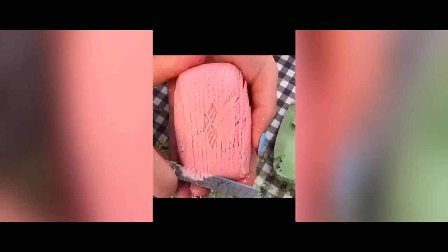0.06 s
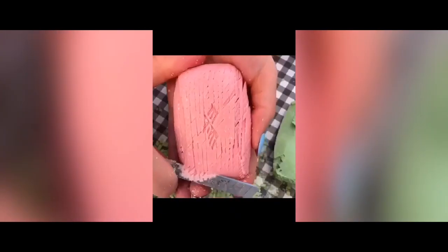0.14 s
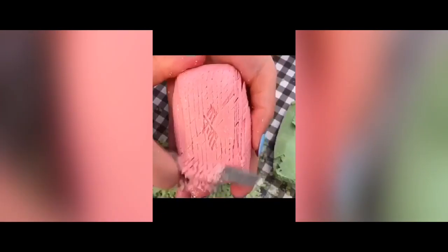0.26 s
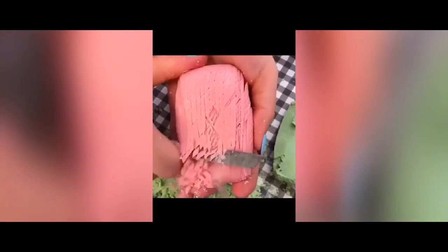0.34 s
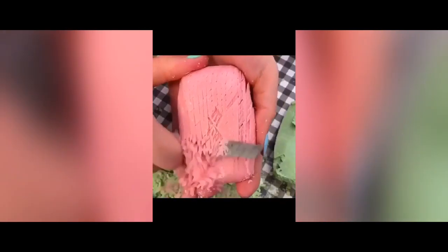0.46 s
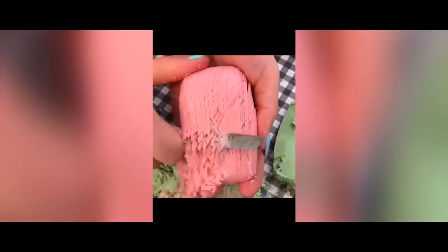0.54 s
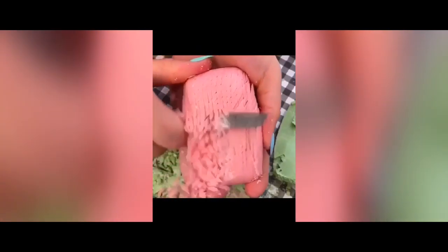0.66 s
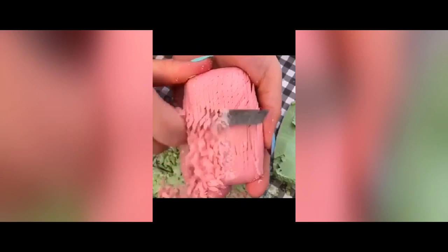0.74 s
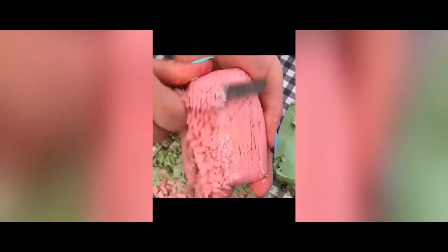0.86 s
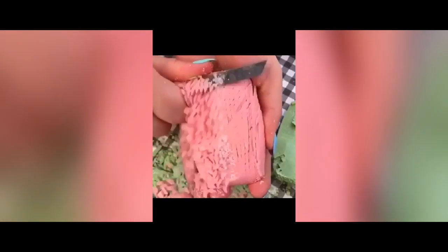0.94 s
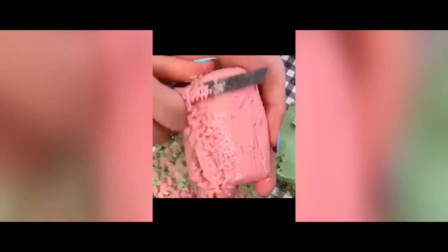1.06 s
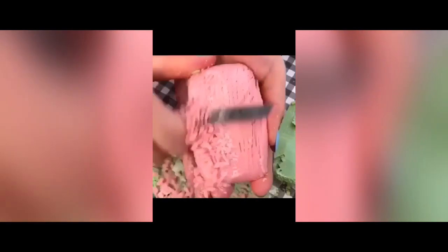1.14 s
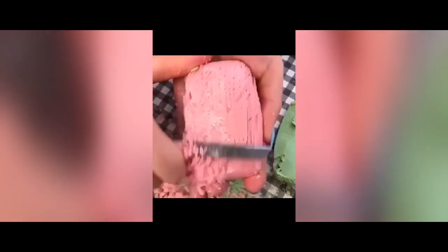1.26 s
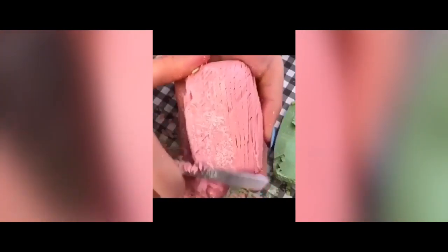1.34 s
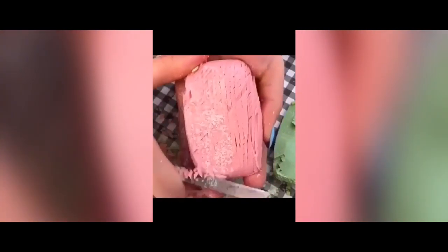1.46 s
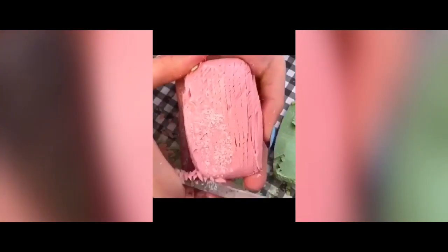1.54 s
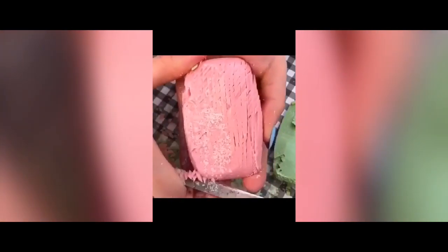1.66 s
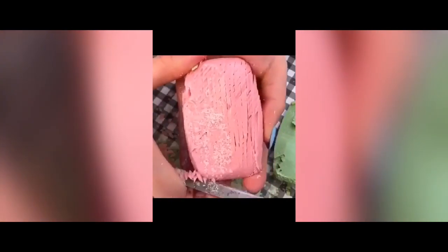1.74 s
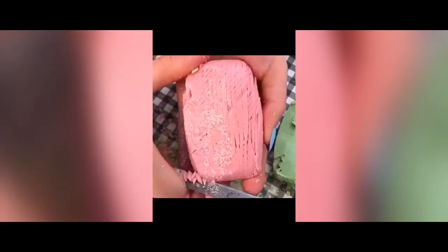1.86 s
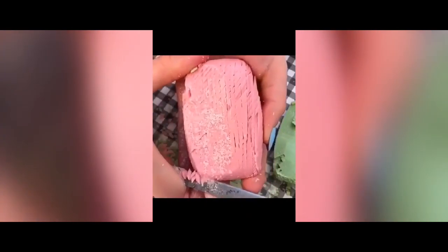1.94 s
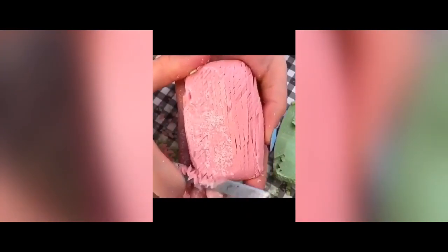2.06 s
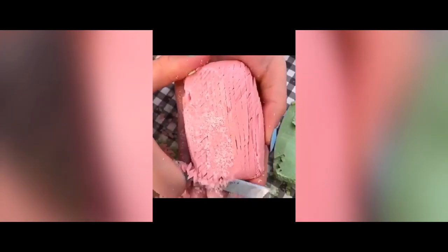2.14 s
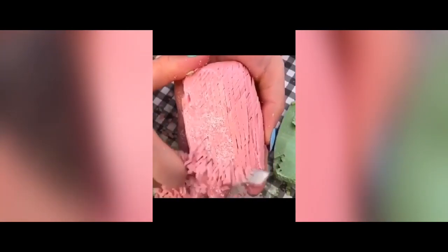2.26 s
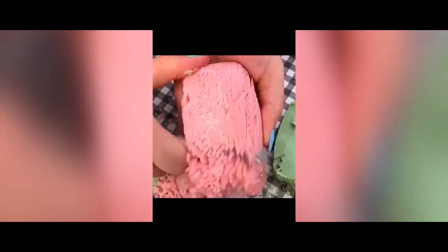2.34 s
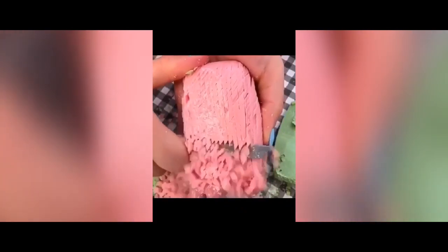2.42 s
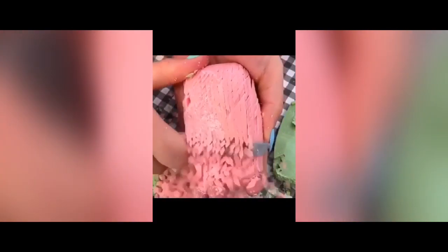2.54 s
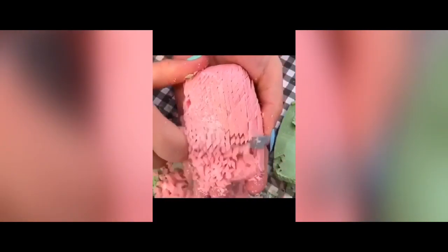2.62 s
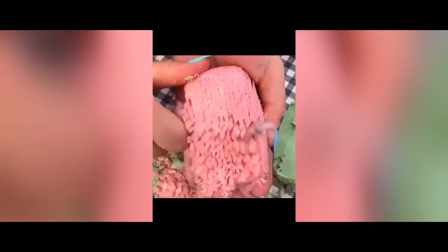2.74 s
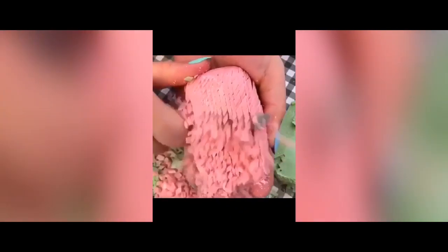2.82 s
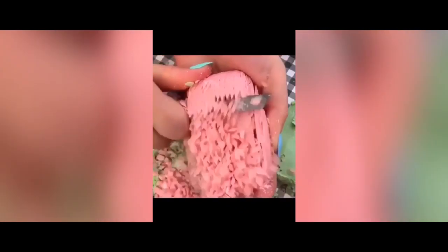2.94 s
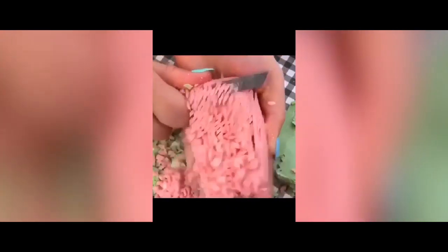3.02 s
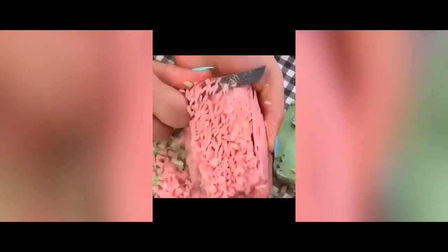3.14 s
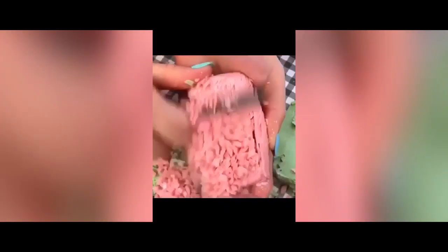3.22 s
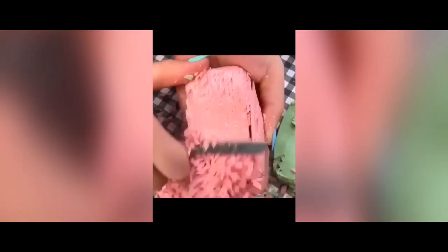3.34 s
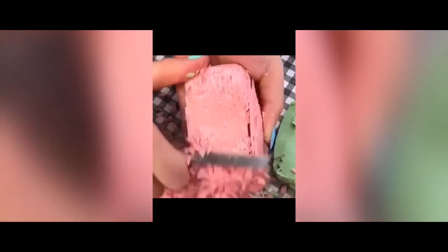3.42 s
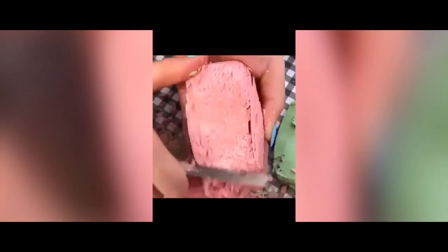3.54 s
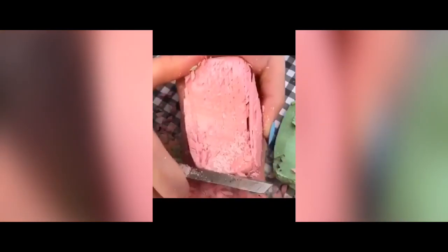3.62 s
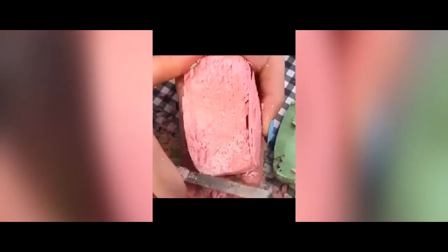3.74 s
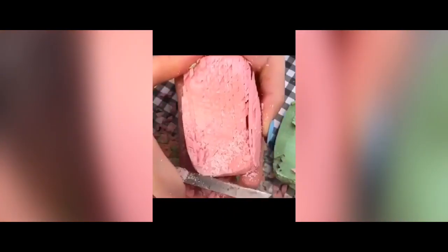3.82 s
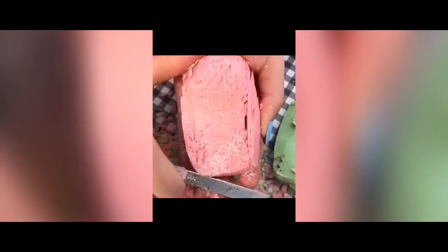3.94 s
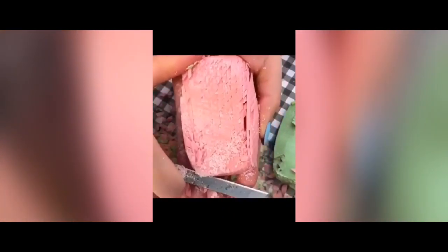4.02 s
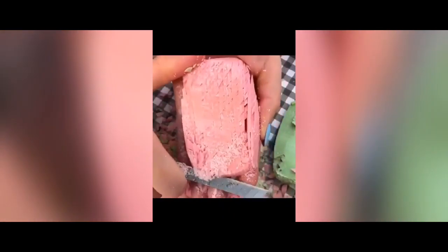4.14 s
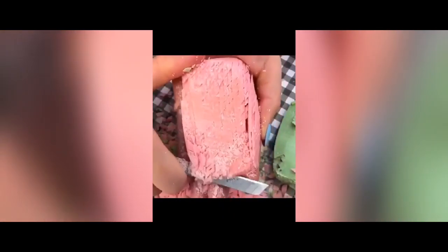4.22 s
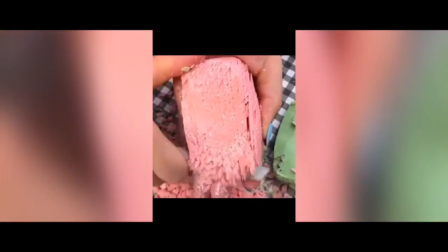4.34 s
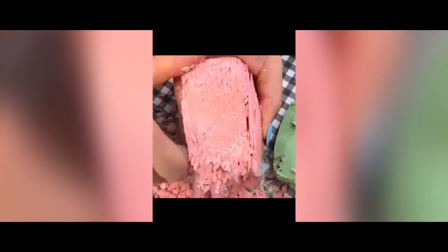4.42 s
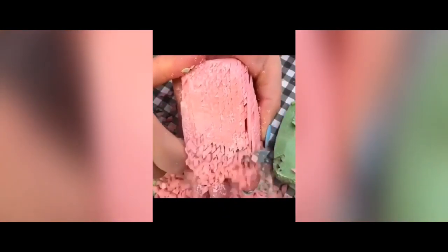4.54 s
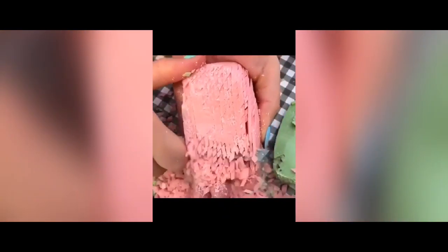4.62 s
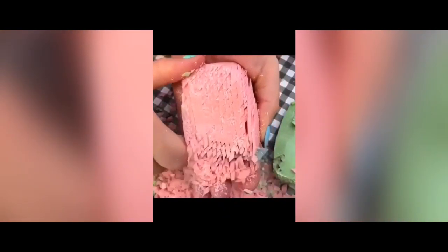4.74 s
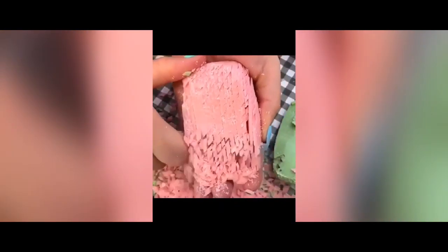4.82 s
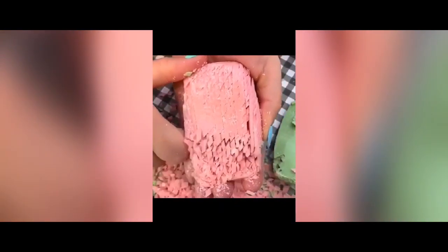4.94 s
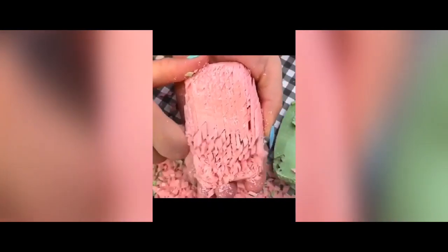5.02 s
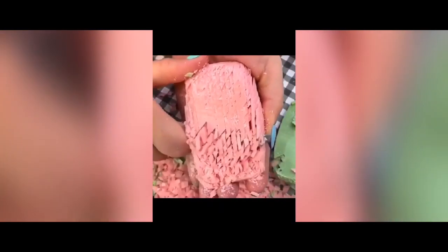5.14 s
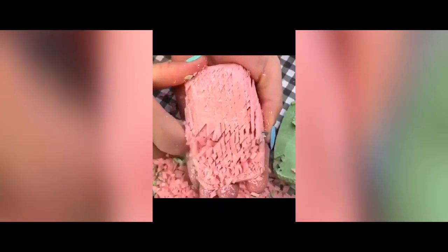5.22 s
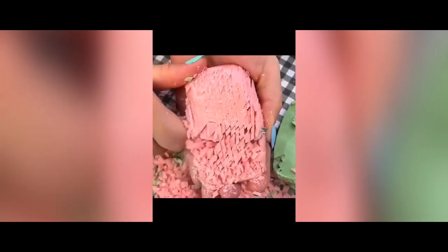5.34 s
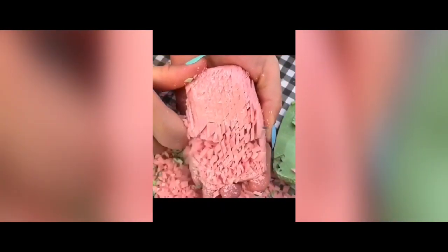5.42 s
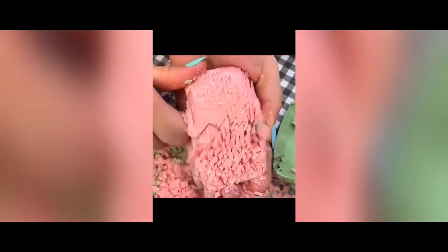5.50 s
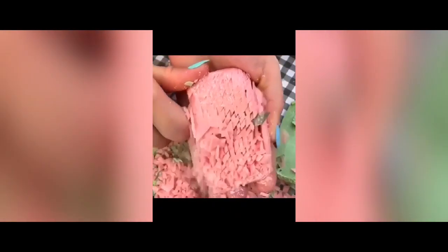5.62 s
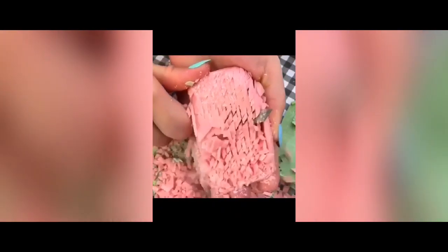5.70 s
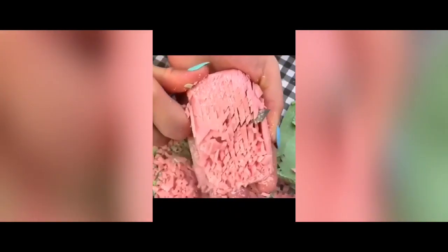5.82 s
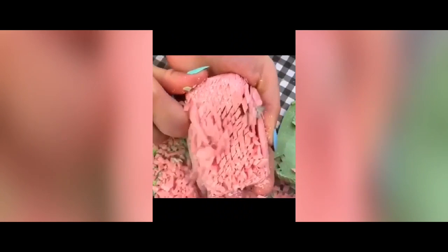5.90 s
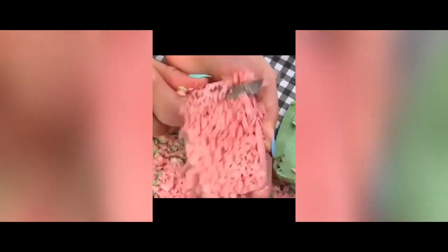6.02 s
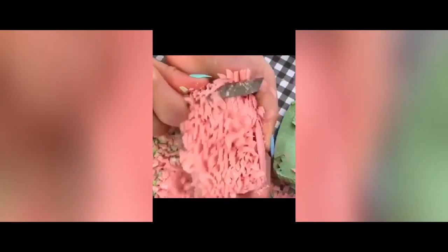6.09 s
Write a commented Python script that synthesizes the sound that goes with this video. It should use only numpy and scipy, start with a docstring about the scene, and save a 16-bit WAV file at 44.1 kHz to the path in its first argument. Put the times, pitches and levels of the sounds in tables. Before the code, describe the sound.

Brittle soap cubes snap and crumble under a blade while pieces patter on a hollow tray. A first crunchy stroke peaks with one hard knock, then settles into scattered clicks. After a near pause comes a thicker, louder stroke, another lull, and a lighter, irregular crackle that brightens at the end. Mono, close and dry, quiet room, highest treble cut off.

```python
"""Bright cracks start almost at once over a faint low hum: a blade is drawn three times through
a dry, pre-scored bar of soap held close to a phone. Cubes snap off as bursts of ringing grit noise
and knock on a hollow tray of resonant modes; random grains make the fine crackle in between.
Below lie coloured room noise that comes and goes, and a sine hum that fades halfway."""
import sys
import numpy as np
from scipy import signal
from scipy.fft import rfft, irfft
from scipy.io import wavfile

SR = 44100
rng = np.random.default_rng(int(sys.argv[2]) if len(sys.argv) > 2 else 0)


def master(y):
    """Save y as 16-bit WAV."""
    cut = np.clip(np.atleast_2d(y).T, -1, 1)
    pcm = np.round(cut * 32767)  # scale
    wavfile.write(sys.argv[1], SR, pcm.astype(np.int16))


def convert_level_to_amplitude(level_db):
    """Map a level in decibels to its linear amplitude factor."""
    exponent = np.asarray(level_db, float) / 20
    return 10 ** exponent


N = 271656

# the clearest snaps and knocks: peak_s, crack_drive_db, tray_knock_db, sizzle_drive_db, length_ms
BREAKS = [(0.1544, -54, -83, -76, 21), (0.237, -46, -60, -45, 19), (0.288, -61, -80, -36, 2.8),
          (0.32, -49, -70, -42.5, 11), (0.3515, -58, -66, -22.5, 1.6), (0.364, -35, -62, -42, 18),
          (0.3921, -43, -54, -28, 3), (0.411, -42, -57, -25, 2), (0.4267, -39, -54, -38, 76),
          (0.4726, -29.5, -58, -35, 14.4), (0.572, -42, -71, -33, 1.5), (0.5921, -40, -52, -38, 18.6),
          (0.62, -39, -68, -42, 9.7), (0.742, -37, -58, -53, 7.6), (0.7698, -41, -58, -32.5, 3.6),
          (0.8216, -29.5, -65, -30, 5.6), (0.8445, -33, -51, -35, 4.7), (0.8666, -52, -39.5, -54, 3.3),
          (0.9027, -43, -57, -38, 1), (0.94, -56, -37, -42, 3.1), (0.962, -36, -58, -34, 6.9),
          (0.97, -40, -34.5, -57, 3.5), (1.009, -35, -65, -42, 5.5), (1.0254, -33.5, -55, -31, 3.8),
          (1.0745, -41.5, -62, -44.5, 60), (1.116, -39, -46, -64, 3.4), (1.1644, -21, -18, -52, 4.52),
          (1.199, -33.5, -41, -35.5, 13), (1.2234, -43, -29, -32, 2), (1.2374, -31, -31, -36, 3.9),
          (1.24, -40.5, -39.5, -38, 52), (1.285, -34.5, -44, -44, 52), (1.4245, -32, -35, -38, 3.7),
          (1.459, -37, -45, -62, 2.1), (1.507, -31, -38.5, -45, 3.6), (1.61, -65, -41, -63, 3.1),
          (1.7307, -29.5, -38.5, -63, 3.7), (1.8082, -40, -43, -43, 4.4), (1.8525, -45, -43.5, -54, 6.8),
          (1.9165, -39, -45, -58, 5.2), (1.9683, -67, -50.5, -73, 5.1), (2.1597, -52.5, -66, -51, 19),
          (2.2142, -44, -57, -46, 11), (2.261, -41.5, -55, -40, 6.8), (2.277, -55, -74, -28, 3.5),
          (2.3284, -42, -70, -32, 1.5), (2.374, -41, -54.5, -41.5, 34), (2.4597, -44.5, -56, -38, 80),
          (2.486, -37.5, -51, -33, 13), (2.506, -34, -40.5, -31, 9.2), (2.546, -38, -41.5, -27.5, 8.2),
          (2.6436, -26, -58, -65, 5.8), (2.674, -32, -52, -41, 4.1), (2.7062, -47, -36, -48, 5.6),
          (2.717, -34, -37, -54, 4.5), (2.731, -28, -44, -26, 0.84), (2.7712, -28.5, -30.5, -38, 4.2),
          (2.875, -36, -44, -35.5, 9.5), (2.907, -38, -43, -30.5, 16.7), (2.9296, -33, -38, -32, 6.2),
          (2.955, -43, -59, -30.5, 43), (2.9781, -38, -34.5, -28, 5.2), (3.0498, -47, -30.5, -37, 2.9),
          (3.052, -45, -27, -28, 1.73), (3.0562, -33, -38, -30, 2.4), (3.074, -23, -26, -33, 2.3),
          (3.076, -42, -32, -36, 2), (3.092, -29, -32, -49, 3.6), (3.0962, -40, -23.5, -39, 2.48),
          (3.16, -29, -36, -47, 1.9), (3.165, -40, -51, -41, 100), (3.2255, -30, -26.5, -45, 4.06),
          (3.273, -26.5, -33, -32.5, 5.2), (3.3065, -54, -44, -38, 3.2), (3.3317, -24.5, -32, -65, 2.2),
          (3.387, -50, -35.5, -61, 4.9), (3.439, -32.5, -47, -61, 55), (3.4942, -33, -50, -41, 3),
          (3.5176, -27.5, -38, -43, 2.6), (3.6322, -34, -35, -48, 1.7), (3.7436, -32.5, -36, -48, 7.44),
          (3.847, -44, -36.5, -66, 1), (3.878, -40, -55, -79, 3.2), (3.9841, -50.5, -49, -60, 12.6),
          (4.0278, -36.5, -40, -75, 1.06), (4.1474, -61, -75, -47, 4.8), (4.2297, -49, -63, -57, 17),
          (4.33, -41, -46, -45.5, 19), (4.4127, -62, -39.5, -61, 4.3), (4.478, -61, -51, -20, 2.1),
          (4.539, -36, -74, -34, 4.5), (4.589, -40, -43.5, -29.5, 6.9), (4.7352, -30.5, -23.5, -32.5, 4.6),
          (4.795, -57, -42, -58, 6), (4.8068, -57, -40, -62, 2.7), (4.8463, -54.5, -62, -64, 3.9),
          (4.8731, -33.5, -36.5, -40, 6.4), (4.917, -42, -47, -54, 3.1), (4.9684, -49.5, -70, -41, 1.5),
          (4.989, -75, -45.5, -56, 4.3), (5.0678, -73, -54.5, -50, 5.3), (5.1129, -75.5, -54, -32, 1.2),
          (5.1208, -36.5, -48.5, -32.5, 3.06), (5.192, -50, -54, -46, 2.1), (5.2072, -61, -59, -41, 1.2),
          (5.314, -49, -51, -40, 2.3), (5.3632, -65, -49, -31.5, 1.8), (5.3779, -44, -51.5, -68, 9.9),
          (5.386, -35.5, -40, -55, 2.7), (5.458, -66, -52.5, -49, 5), (5.517, -52, -73, -35, 0.81),
          (5.5257, -47, -52, -46, 4), (5.545, -38.5, -60, -36, 1.7), (5.668, -72, -50, -30.5, 1.3),
          (5.687, -75, -57, -46, 38), (5.705, -71, -48, -39, 4.8), (5.7368, -65, -50, -37, 1.2),
          (5.8103, -64, -49, -26, 3.5), (5.8403, -35.5, -46.5, -35, 2.8), (5.868, -47, -50, -38.5, 6.4),
          (5.9478, -39, -46.5, -52, 5), (5.961, -33, -53, -46, 1.6), (5.988, -43, -47, -43, 22.6),
          (6.0376, -57, -60, -27, 1.8), (6.045, -64, -49, -29.5, 5.8), (6.0972, -42, -53, -32.5, 13),
          (6.1188, -42, -44.5, -25.5, 6.3), (6.1435, -39, -43, -29, 10.8), (6.1501, -45, -56, -21, 1.4)]
# resonant modes of the tray under the falling crumbs: pitch_hz, width_hz, level_db (relative)
TRAY_MODES = [(830, 150, -13), (970, 150, -8), (1130, 190, 0), (1600, 280, -3), (2250, 350, -11),
              (2850, 350, -12), (3550, 260, -12), (4750, 350, -20)]
CRUMB_HZ = np.geomspace(2100, 11800, num=12)  # pitches of crumbs, large to small


def snaps():
    """A break spreads, peaks and crumbles away; small cubes sizzle, heavy ones knock the tray."""
    rise, fall = 0.29, 0.38  # in lengths of the break
    split_hz = 5840  # crack below, sizzle above
    mix_spread_db, spot_spread_db = 3, 2.5  # crumb sizes and tray modes, from one break to the next
    hard, short_ms = 2.2, 8.0  # first contact against the rattle after it, and where it gives way
    t = np.arange(N) / SR
    drive, knock = np.zeros((len(CRUMB_HZ), N)), np.zeros(N)
    force = rng.standard_normal(N)
    small = 1 / (1 + (split_hz / CRUMB_HZ) ** 6)
    # every break frees its own mix of crumb sizes and lands on its own spot
    mixes = convert_level_to_amplitude(mix_spread_db * rng.standard_normal((len(BREAKS), len(CRUMB_HZ))))
    spots = convert_level_to_amplitude(spot_spread_db * rng.standard_normal((len(BREAKS), len(TRAY_MODES))))
    spots = spots * landing(np.array(BREAKS)[:, 0]).T
    uneven = 1.17 + 0.32 * grains(740, 10.6, 0.0001, 0.00069)  # a long break goes in jerks
    for (peak_s, crack_db, knock_db, sizzle_db, ms), mix, spot in zip(BREAKS, mixes, spots):
        peak = int(peak_s * SR)
        at = slice(max(peak - SR // 25, 0), peak + SR // 10)
        lag = (t[at] - peak_s) * 1000 / max(ms, 1)  # in lengths
        burst = np.where(lag < 0, np.exp(-(lag / rise) ** 2 / 2), np.exp(-np.abs(lag) / fall))
        # the jerks share out the energy of the break without changing it
        jerky = burst * uneven[at]
        burst = jerky * np.linalg.norm(burst) / np.linalg.norm(jerky)
        strength = np.linalg.norm(burst)
        level = convert_level_to_amplitude(crack_db) * (1 - small) + convert_level_to_amplitude(sizzle_db) * small
        drive[:, at] += np.outer(unit(mix) * level, burst)
        started = lag >= -rise
        rattle = burst * force[at] * started
        # a short break is mostly one hard contact, a long one a rattle
        rattle[np.argmax(started)] += hard * strength / (1 + (ms / short_ms) ** 2)
        blow = tray(np.outer(spot, rattle))
        # whichever modes the spot favours, the tray gives back the energy of the blow
        knock[at] += convert_level_to_amplitude(knock_db) * blow * strength / np.linalg.norm(blow)
    return (drive * crumbs()).sum(axis=0) + knock


def crackle():
    """Grit breaking under the blade and crumbs pattering on the tray, too dense to count."""
    # steady crackle of the three strokes: time_s, grit_at_blade_drive_db, tray_patter_drive_db
    strokes = [(0.0, -85.5, -85), (0.301, -60, -84), (0.44, -58, -69), (0.545, -63.5, -71),
               (0.665, -43, -50.5), (0.705, -48.5, -53), (0.725, -58, -61), (0.737, -47, -59),
               (0.788, -45, -53.5), (1.033, -50, -53), (1.141, -60.5, -59), (1.3, -52, -51.5),
               (1.5, -53.5, -51.5), (2.093, -76, -73), (2.206, -51.5, -84), (2.486, -58.5, -60),
               (2.587, -58, -59), (2.722, -43.5, -47), (2.81, -48, -50.5), (2.85, -54.5, -56.5),
               (3.05, -41.5, -47.5), (3.302, -56.5, -51), (3.437, -46, -51.5), (3.74, -49.5, -47),
               (3.954, -71.5, -63), (4.18, -78, -78.5), (4.254, -57, -62.5), (4.38, -59, -65),
               (4.525, -48, -56.5), (4.9, -60, -54), (5.03, -66, -69.5), (5.16, -58, -61),
               (5.27, -66, -70.5), (5.48, -63.5, -71), (5.63, -60.5, -67), (5.75, -56, -68),
               (5.92, -67, -63), (6.16, -48.5, -61.5)]
    t = np.arange(N) / SR
    s, *columns = np.transpose(strokes)
    # the crumbs loosened by the snaps add their power to the steady crackle
    grit_db, patter_db = (10 * np.log10(convert_level_to_amplitude(np.interp(t, s, column)) ** 2 + loose)
                          for column, loose in zip(columns, trickle()))
    # fresh breaks at the blade are bright; crumbs tumbling on the tray are dull (dB per octave)
    tilt_db = np.clip(0.47 * (grit_db - patter_db) - 0.6, -8, 4)
    together = grains(350, 5, 0.0002, 0.002)  # tiny breaks shared by all sizes and by the tray
    breaking = 0
    for hz, ring in zip(CRUMB_HZ, crumbs()):
        alone = grains(90, 15.2, 0.00032, 0.032)  # single crumbs ring at their own pitch
        tilt = convert_level_to_amplitude(tilt_db * np.log2(hz / 5000))
        breaking = breaking + tilt * (0.7 * together + 0.47 * alone + 0.24) * ring
    patter = [convert_level_to_amplitude(patter_db) * (0.3 * together + 0.7 * grains(320, 3.5, 0.0002, 0.0011) + 0.06)
              for _ in TRAY_MODES]
    # the push of the blade shakes the hands, a faint dull rustle that follows the crackle
    dull = signal.butter(1, [110, 650], "band", fs=SR, output="sos")
    push = unit(signal.sosfilt(dull, rng.standard_normal(N)))
    jolts = 0.47 + 0.58 * grains(60, 4, 0.00074, 0.0069)
    shake = convert_level_to_amplitude(-32.5 + 0.44 * patter_db + 0.14 * grit_db) * push * jolts
    forces = patter * landing(t) * rng.standard_normal((len(TRAY_MODES), N))
    return convert_level_to_amplitude(grit_db) * breaking + tray(forces) + shake


def trickle():
    """Power of the grit and patter that every snap sets loose, more from a loud or long one."""
    grit_level_db, patter_level_db = -16.5, -11  # against the snap, before its length counts
    loosen_s, trickle_s = 0.0044, 0.014  # grit starts just before the snap, all trickles away after
    s, crack_db, knock_db, sizzle_db, ms = np.transpose(BREAKS)
    t = np.arange(0, N + 64, 64) / SR  # coarse time grid
    lag = t[:, None] - s
    fade = np.exp(-2 * np.abs(lag) / np.where(lag < 0, loosen_s, trickle_s))
    shape = fade * ms / 1000 / trickle_s
    grit = convert_level_to_amplitude(grit_level_db) ** 2 * shape @ (convert_level_to_amplitude(crack_db) ** 2 + convert_level_to_amplitude(sizzle_db) ** 2)
    patter = convert_level_to_amplitude(patter_level_db) ** 2 * (shape * (lag > 0)) @ convert_level_to_amplitude(knock_db) ** 2
    return [np.interp(np.arange(N) / SR, t, power) for power in (grit, patter)]


def crumbs():
    """Grit noise split into the unrelated rings of crumbs of each size."""
    # spectrum of the breaking grit: pitch_hz, density_db (relative, per Hz)
    grit_spectrum = [(1180, 5), (2000, -9.5), (3180, -2.5), (4120, -4), (8280, -6), (11200, -9),
                     (12300, -13), (16000, -55), (22000, -120)]
    grit = coloured(grit_spectrum)
    return np.array([signal.lfilter(*signal.iirpeak(hz, 5.0, SR), np.roll(grit, rng.integers(N)))
                     for hz in CRUMB_HZ])


def tray(forces):
    """The tray rings briefly; each mode feels its own force, as crumbs land in different spots."""
    no_bass = signal.butter(6, 710, "high", fs=SR, output="sos")

    def ring(x):
        """Sum of the modes, neighbours swinging in opposite senses, too small to radiate bass."""
        modes = 0
        for k, (hz, width, db) in enumerate(TRAY_MODES):
            mode = signal.lfilter(*signal.iirpeak(hz, hz / width, SR), x[k])
            modes = modes + (-1) ** k * convert_level_to_amplitude(db) * mode
        return signal.sosfilt(no_bass, modes)

    tap = (np.arange(SR // 10) == 0).astype(float)
    return ring(forces) / np.linalg.norm(ring([tap] * len(TRAY_MODES)))  # one tap has energy 1


def landing(s):
    """Gain of each tray mode at time s: as the bar is turned the crumbs land elsewhere."""
    # balance of the tray's upper modes against its lower ones: time_s, upper_gain_db
    balance = [(0.4, 3.5), (1.16, -3), (2.75, -4), (3.1, 1.5), (3.7, -1), (4.7, -2.5)]
    upper = np.array(TRAY_MODES)[:, 0] > 1350  # Hz
    return convert_level_to_amplitude(np.outer(upper, np.interp(s, *np.transpose(balance))))


def room():
    """Quiet air that comes and goes, and a low hum that fades halfway."""
    # spectrum of the quiet air: pitch_hz, density_db (relative, per Hz)
    air_spectrum = [(24, -22), (40, 10), (264, 0.5), (700, -6.5), (1080, -8.5), (1500, -49), (2800, -15),
                    (10900, -24), (12000, -18), (22000, -120)]
    # fade of the hum: time_s, rms_level_db
    hum_fade = [(0, -72.5), (3, -76.5), (3.7, -100), (6.16, -111)]
    t = np.arange(N) / SR
    hum_level = convert_level_to_amplitude(np.interp(t, *np.transpose(hum_fade)))
    hum = hum_level * np.sqrt(2) * np.sin(2 * np.pi * 33 * t)  # 33 Hz
    wander = 0.59 + 0.4 * grains(4.1, 3.0, 0.026, 0.09)
    return convert_level_to_amplitude(-67.5) * coloured(air_spectrum) * wander + hum


def grains(per_s, spread_db, rise_s, fall_s):
    """Envelope of rms 1: random grains of uneven size, each swelling and dying away."""
    env = (rng.random(N) < per_s / SR) * convert_level_to_amplitude(spread_db * rng.standard_normal(N))
    for tau in (rise_s, fall_s):
        env = signal.lfilter([1], [1, -np.exp(-1 / (tau * SR))], env)
    return unit(env)


def coloured(points):
    """Noise of rms 1 with a (Hz, dB) spectrum, drawn over log frequency."""
    hz, db = np.transpose(points)
    f = np.maximum(np.fft.rfftfreq(N, 1 / SR), 1)
    gain = convert_level_to_amplitude(np.interp(np.log(f), np.log(hz), db))
    return unit(irfft(rfft(rng.standard_normal(N)) * gain, N))


def unit(x):
    """Scale to rms 1."""
    return x / np.sqrt(np.mean(x ** 2))


def scene():
    """Everything is close and dry."""
    return (snaps() + crackle() + room())[None]


def top_cut(x):
    """Nothing passes above the cut-off."""
    return signal.sosfilt(signal.butter(12, 12830, fs=SR, output="sos"), x)


def record(dry):
    """The phone cuts the top steeply above 11650 Hz."""
    steep = signal.ellip(8, 0.3, 70, 11650, fs=SR, output="sos")
    mix = signal.sosfilt(steep, dry)
    return top_cut(mix)


dry = scene()
out = record(dry)
master(out)
```